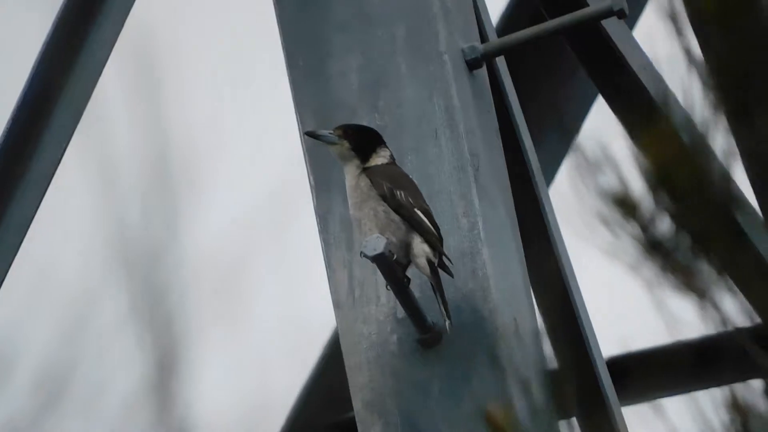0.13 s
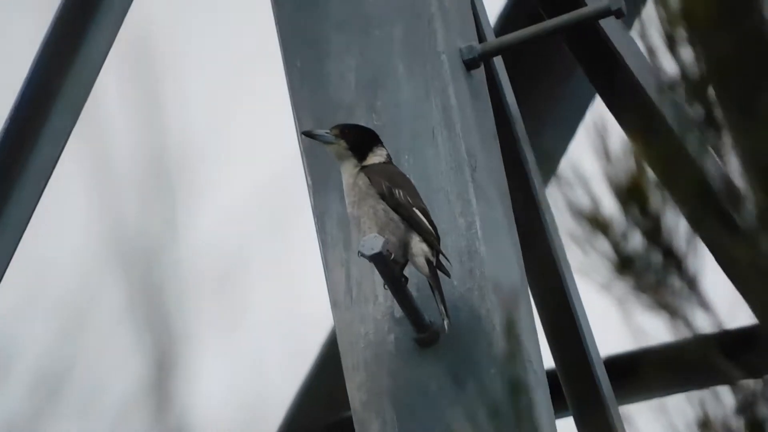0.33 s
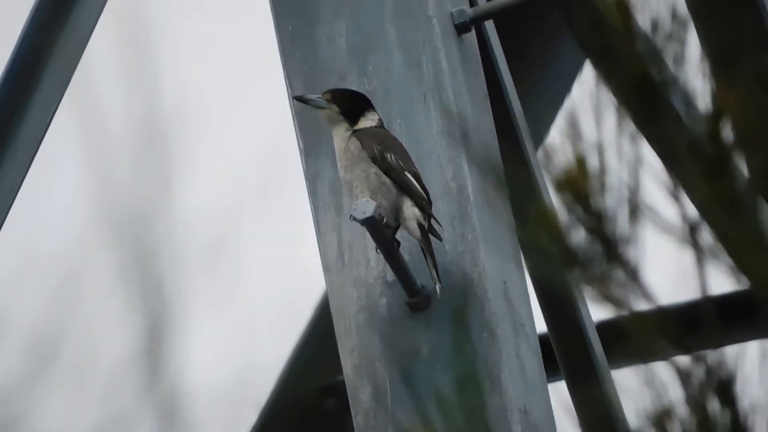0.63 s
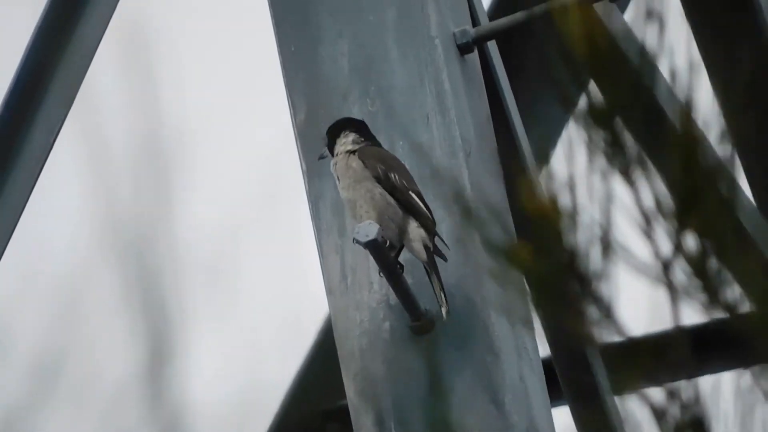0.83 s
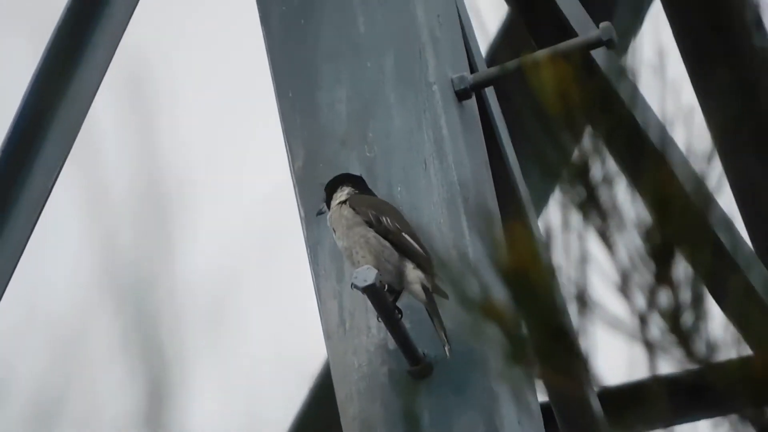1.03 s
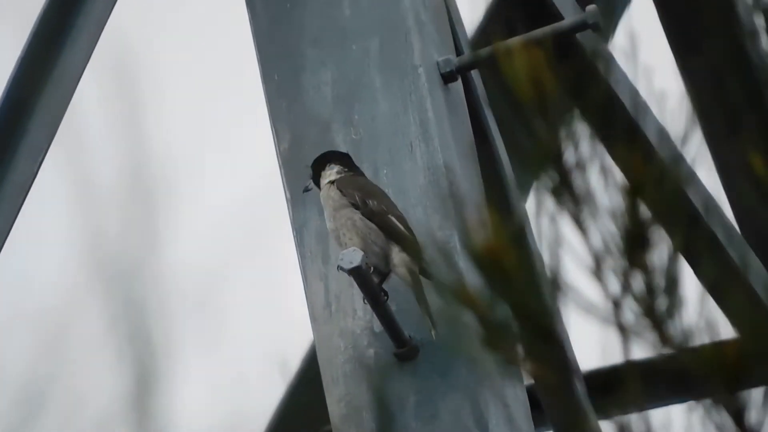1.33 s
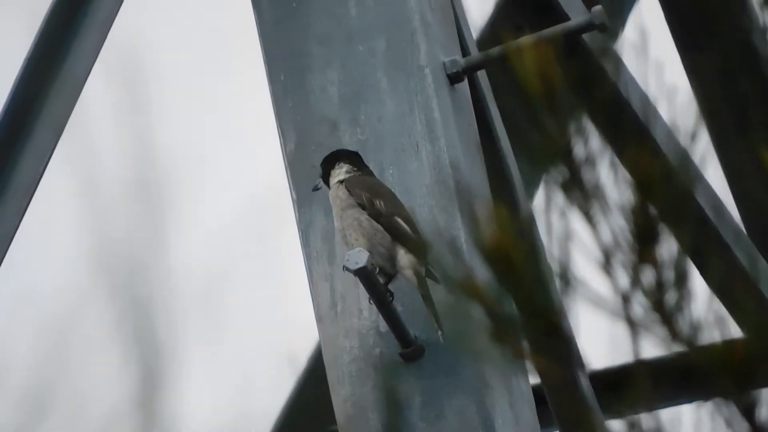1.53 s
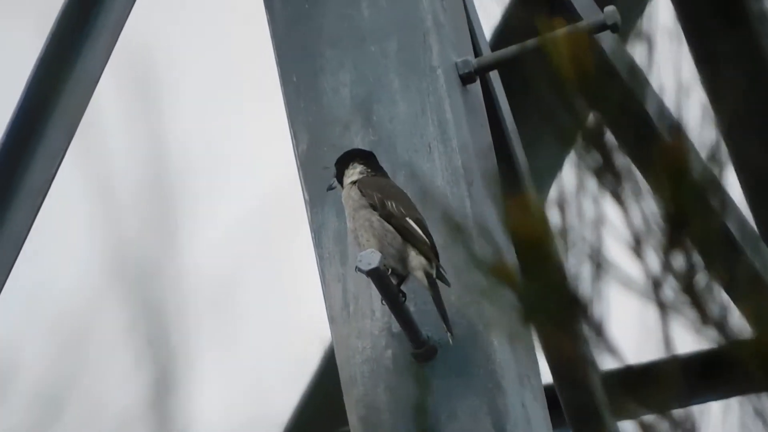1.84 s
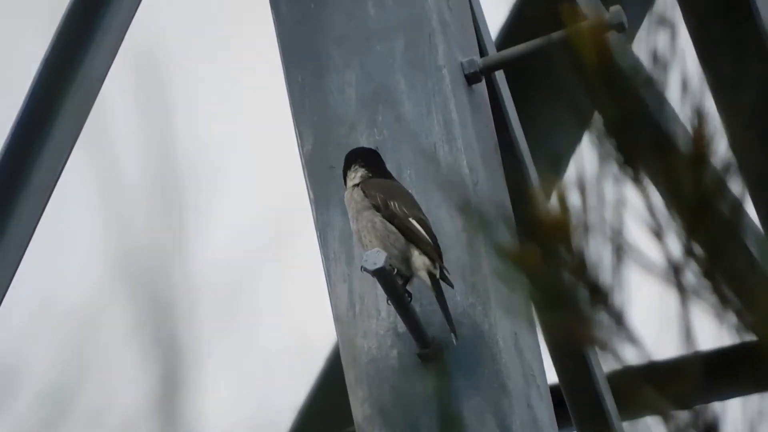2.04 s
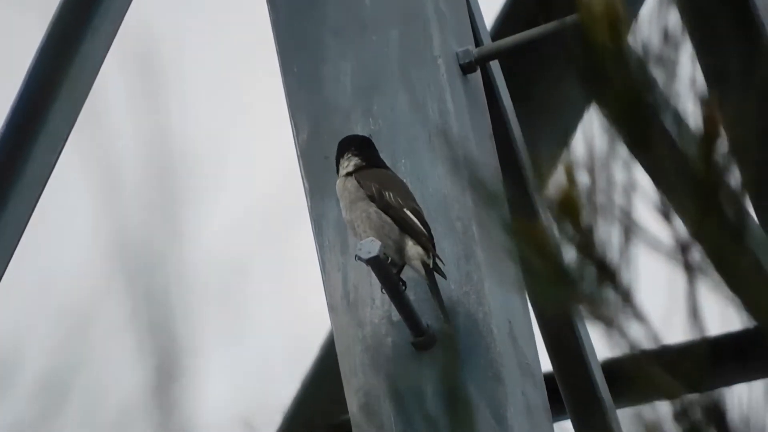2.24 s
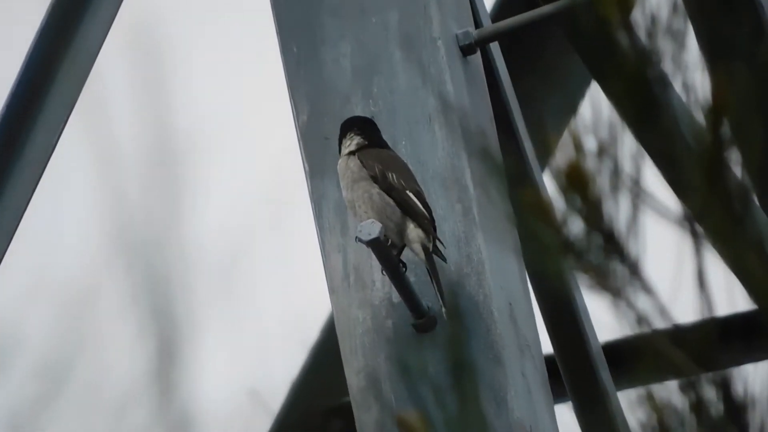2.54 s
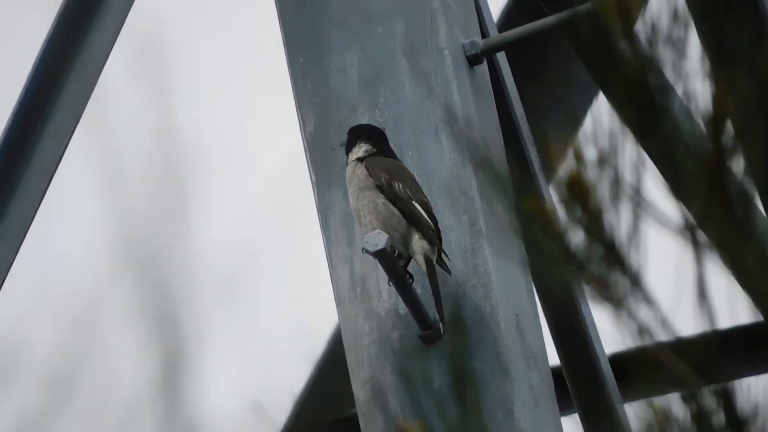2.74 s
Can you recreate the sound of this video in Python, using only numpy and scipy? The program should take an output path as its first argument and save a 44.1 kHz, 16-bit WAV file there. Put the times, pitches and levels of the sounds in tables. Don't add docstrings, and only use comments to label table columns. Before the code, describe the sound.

A songbird pipes quick fluted notes and chirps outdoors over a steady low traffic rumble

```python
import sys
import numpy as np
from scipy import signal
from scipy.io import wavfile
from scipy.ndimage import uniform_filter1d

SR = 44100
rng = np.random.default_rng(int(sys.argv[2]) if len(sys.argv) > 2 else 0)


def undo_db(level):
    steps = np.asarray(level, float) / 20
    return 10 ** steps


def pcm_store(signal):
    levels = np.round(np.clip(np.atleast_2d(signal), -1, 1) * 32767)
    wavfile.write(sys.argv[1], SR, levels.astype(np.int16).T)


N = 126567


def evened(x):
    return x / np.sqrt(np.mean(x ** 2) + 1e-20)


def read(points, hz):
    f, value = np.transpose(points)
    return np.interp(np.log(hz + 1), np.log(f + 1), value)


def add(mix, s, sound):
    part = mix[round(s * SR):][:len(sound)]
    part += sound[:len(part)]


def noise(length):
    return rng.standard_normal(SR // 4)[:length]


def drift(length, size):
    return uniform_filter1d(rng.standard_normal(SR // 4), size)[:length] * np.sqrt(size)


def resonate(x, hz, width):
    turn = np.exp(2j * np.pi * np.cumsum(hz * np.ones(len(x))) / SR)
    r = np.exp(-np.pi * width / SR)
    smooth = np.tile([1 - r, 0, 0, 1, -r, 0], (3, 1))
    return 2 * (turn * signal.sosfilt(smooth, x / turn)).real


PORT_LAG = 2
# pitch in Hz, left minus right in dB.
LEAN = [(60, -0.5), (240, -0.5), (950, -1.0), (3770, -1), (15000, 0)]


def bed(shape, db, swell_db, patchy_db, same, skirt_db):
    frames, hz = N // 512 + 6, np.fft.rfftfreq(2048, 1 / SR)
    a, b, c, d, patches = rng.standard_normal((frames, 1025, 5)).T
    patches = evened(uniform_filter1d(uniform_filter1d(patches, 12, 0), 7, 1))
    same = np.clip(same(hz), -1, 1)[:, None]
    left = a + 1j * b
    right = same * left + np.sqrt(1 - same ** 2) * (c + 1j * d)
    z = np.array([left, right])
    z[0] *= np.exp(-2j * np.pi * hz * PORT_LAG / SR)[:, None]
    below = skirt_db * np.maximum(np.log2(shape[0][0] / (hz + 1)), 0)
    above = skirt_db * np.maximum(np.log2((hz + 1) / shape[-1][0]), 0)
    z *= undo_db((read(shape, hz) + below + above)[:, None] + patchy_db * patches)
    z *= undo_db(np.array([.5, -.5])[:, None, None] * read(LEAN, hz)[:, None])
    sound = signal.istft(z, nperseg=2048, noverlap=1536)[1][:, :N]
    return undo_db(db + swell_db) * evened(sound)


# pitch in Hz, level in dB per Hz.
RUMBLE = [(20, 1.5), (40, 0.5), (57, -11.5), (72, 0.5), (139, -5), (250, -10), (398, -14), (500, -27)]
# pitch in Hz, level in dB per Hz.
TYRES = [(280, -12.5), (480, -6.5), (740, -3.5), (877, -2.5), (1170, -6), (1240, -7), (2020, -14.5),
         (2250, -19), (6000, -44.5), (7800, -93), (13200, -120)]
# pitch in Hz, likeness from 0 to 1.
SAME = [(25, .994), (170, .9975), (300, .98), (600, .9), (1200, .93), (2000, .82), (4000, .55), (6000, .2)]
# time in seconds, rumble in dB, tyres in dB, engine hum in dB.
TRAFFIC = [
    (0, -5, 1, 10),
    (.3, 1, 0, -3),
    (.6, -2, 0, 7.5),
    (0.903, -1, -0.5, -6.5),
    (1.202, -3, 1, 4),
    (1.5, -2, 0.5, 5.5),
    (1.8, -1.5, -1, 7),
    (2.1, -1, -0.5, 6),
    (2.4, 0, -1, -5.5),
    (2.87, 0, -0.5, 4),
]
RUMBLE_DB, TYRES_DB, HUM_DB = -37, -47.5, -50
HUM_HZ, HUM_WIDTH = 56.68, 8.3


def traffic():
    s, rumble_db, tyre_db, hum_db = np.transpose(TRAFFIC)
    t = np.arange(N) / SR

    def same(hz):
        return read(SAME, hz)

    rumble = bed(RUMBLE, RUMBLE_DB, np.interp(t, s, rumble_db), 0.72, same, -28)
    hum = evened(resonate(rng.standard_normal(N), HUM_HZ, HUM_WIDTH))
    hum = undo_db(HUM_DB + np.interp(t, s, hum_db)) * hum
    tyres = bed(TYRES, TYRES_DB, np.interp(t, s, tyre_db), 0.94, same, -45)
    return rumble + hum + tyres


# pitch in Hz, level in dB per Hz.
HISS = [(3530, -7), (6000, -3.5), (6570, -2.5), (15400, -1.5)]


def microphone_hiss():
    return bed(HISS, -71, 0, 0.35, lambda hz: 0 * hz, -20)


RISE_S, FALL_S = .005, .007
WOBBLE, FUZZ = .005, 0.31
FLUTTER_DB, SIDE_FLUTTER_DB = 1.0, 2.0


def whistle(length, db, first_hz, last_hz, partials=(), fade_db=0):
    t = np.arange(0, length + FALL_S, 1 / SR)
    hz = first_hz + (last_hz - first_hz) * t / length
    hz = hz * (1 + WOBBLE * drift(len(t), size=200))
    turn = 2 * np.pi * np.cumsum(hz) / SR
    tone = np.sin(turn)
    for ratio, side_db in partials:
        tone += undo_db(side_db + SIDE_FLUTTER_DB * drift(len(t), size=400)) * np.sin(ratio * turn)
    rise = np.clip(t / RISE_S, 0, 1)
    fall = np.clip((length + FALL_S - t) / (2 * FALL_S), 0, 1)
    level = undo_db(db + fade_db * (t / length) ** 2 + FLUTTER_DB * drift(len(t), size=300))
    fuzz = 1 + FUZZ * drift(len(t), size=120)
    return np.sqrt(2) * level * rise * fall * tone * fuzz


# start in seconds, length in seconds, level in dB, first Hz, last Hz.
WHISTLES = [(.068, .02, -61, 2950, 2860), (.068, .03, -61, 2200, 2150), (.085, .058, -60, 2860, 2960),
            (.139, .034, -53.5, 2950, 2750), (.187, .06, -67, 2910, 2890), (.135, .019, -56, 1990, 1960),
            (.16, .03, -56, 2060, 2260), (.19, .016, -56, 2060, 1900), (.204, .016, -58, 2120, 2170),
            (.418, .02, -58, 2850, 2860), (.688, .027, -57, 3000, 2910), (.775, .025, -62, 3010, 2930),
            (1.053, .015, -57, 1990, 2000), (1.096, .016, -57, 1980, 1960), (.99, .04, -62, 2820, 2740),
            (1.212, .035, -55, 2870, 2850), (1.325, .04, -62, 2610, 2630), (2.04, .059, -65, 1990, 2000),
            (2.33, .07, -63, 2170, 2400), (2.397, .05, -58.5, 2230, 2200), (2.44, .05, -64, 2350, 2390)]
# start in seconds, length in seconds, level in dB, first Hz, last Hz.
CHIRPS = [(0.095, 0.03, -63.5, 3470, 3830), (0.134, 0.036, -71, 6020, 5530),
          (0.164, 0.036, -67, 5500, 5200), (.202, .04, -73, 5210, 5050), (0.184, 0.045, -65.5, 3230, 3300),
          (0.752, 0.019, -69.5, 3820, 3770), (1.024, 0.024, -66, 3540, 3700),
          (1.096, .015, -72, 5030, 4800), (1.109, 0.035, -70, 4570, 4570), (1.137, 0.023, -65, 3900, 3560),
          (1.15, 0.04, -66, 3450, 3640), (1.171, 0.019, -58.5, 3910, 3950), (1.193, 0.023, -60, 3060, 3020),
          (1.226, 0.025, -54.5, 2280, 2220), (1.318, 0.03, -67.5, 3510, 3450),
          (1.401, 0.044, -78, 3950, 4150), (1.443, 0.0385, -70.5, 4250, 3840),
          (0.962, 0.022, -64.5, 2765, 2780), (2.398, 0.06, -76.5, 4520, 4390),
          (1.194, .04, -73, 6200, 5640), (0.307, .025, -69, 5000, 5050), (2.849, 0.047, -62, 4070, 4350)]


def bird():
    out = np.zeros(N)
    for s, *note in WHISTLES:
        add(out, s, whistle(*note))
    for s, *note in CHIRPS:
        octave = [(2, -14)] if 2500 < note[2] < 3400 else []
        add(out, s, whistle(*note, octave))
    return out


RASP_HZ, RASP_ROUGH = 78, .45
RASP_RISE, RASP_CLIMB = 1.25, .1


def rasp(length, db, scale, throat):
    t = np.arange(0, length, 1 / SR)
    phase = (RASP_HZ * t + 0.22 * drift(len(t), size=600)) % 1
    gate = 1 - RASP_ROUGH + RASP_ROUGH * 3 * np.exp(-phase / 0.33)
    drive = gate * noise(len(t))
    climb = scale * (1 + RASP_CLIMB * (t / length - .5))
    body = np.zeros(len(t))
    for hz, width, throat_db in throat:
        body += undo_db(throat_db) * evened(resonate(drive, hz * climb, width))
    breath = np.sin(np.pi * (t / length) ** RASP_RISE)
    return undo_db(db) * breath * evened(body)


# start in seconds, length in seconds, level in dB, throat pitch scale.
RASPS = [
    (.222, 0.12, -49.5, 0.94),
    (0.068, 0.028, -63, 0.97),
]
# pitch in Hz, width in Hz, level in dB.
RASP_THROAT = [(2780, 1230, 3), (3450, 750, -4.5), (4120, 590, -5), (5800, 1800, -14.5)]
# pitch in Hz, width in Hz, level in dB.
TICK_THROAT = [(5200, 1200, 13), (5900, 310, 0)]
SCATTER_WIDTH = .4


def scold():
    out, t = np.zeros((3, N)), np.arange(SR) / SR
    for row in out:
        for (s, *call), throat in zip(RASPS, (RASP_THROAT, TICK_THROAT)):
            add(row, s, rasp(*call, throat))
    haze = rng.standard_normal((2, SR)) * undo_db(-60 * t)
    haze = undo_db(-4) * haze / np.linalg.norm(haze[0])
    lingering = signal.fftconvolve(out[:1], haze, axes=1)[:, :N]
    return out[0] + SCATTER_WIDTH * out[1:] + lingering


# start in seconds, length in seconds, level in dB, first Hz, last Hz.
RASP_VOICES = [
    (.26, 0.0564, -55.5, 2720, 2900),
    (.228, .09, -67, 2900, 3700),
    (.255, 0.044, -67, 4800, 3700),
]


def rasp_voice():
    out, t = np.zeros(N), np.arange(N) / SR
    for k, (s, *note) in enumerate(RASP_VOICES):
        octave = [] if k else [(2, -16)]
        add(out, s, whistle(*note, octave))
    return out * (1 + np.cos(2 * np.pi * RASP_HZ * (t - .2685)))


# start in seconds, length in seconds, level in dB, pitch in Hz, overtones in dB.
FLUTES = [
    (.36, .033, -43, 1825, -14.5),
    (.618, .044, -44.5, 1738, -12),
    (.904, .04, -44.5, 1738, -9.5),
]
# pitch as a multiple of the note, level in dB.
SIDE_TONES = [(1.385, -9), (1.46, -17), (1.587, -4), (1.778, -15)]
# pitch in Hz, width in Hz, level in dB.
FLUTE_AIR = [(2500, 800, 0), (1850, 300, -3), (4400, 800, -22)]
# start in seconds, length in seconds, level in dB, first Hz, last Hz.
GRACES = [(.312, .03, -60, 2600, 2050), (.349, .0175, -49, 2040, 1860), (.389, .033, -51, 1880, 2050),
          (.484, .015, -57, 1980, 1930), (.655, .022, -50, 1790, 1930), (.672, .012, -48, 1780, 1760),
          (.626, .026, -54, 2400, 2440), (.646, .028, -57, 2540, 2560), (.906, .022, -55, 2490, 2460),
          (.372, .02, -57, 2540, 2620), (.942, .028, -53, 1770, 1890), (1.228, .04, -53.5, 2610, 2640),
          (.772, .036, -55, 1990, 1940), (.735, .02, -56, 1770, 1760), (1.008, .016, -55, 1730, 1720),
          (1.03, .02, -56, 1760, 1860)]


def flute():
    out = np.zeros(N)
    for s, length, db, hz, over_db in FLUTES:
        sides = [(ratio, side_db + over_db) for ratio, side_db in SIDE_TONES]
        add(out, s, whistle(length, db, hz * .988, hz * 1.014, sides, fade_db=-2.5))
        add(out, s, rasp(length, db - 10, 0.94, FLUTE_AIR))
    for s, *note in GRACES:
        add(out, s, whistle(*note))
    return out


ECHO_S, ECHO_SMEAR_S, ECHO_DB, ECHO_TOP_HZ = .094, .004, -18, 3400
YARD_DB, YARD_T60, YARD_WIDTH = -8, .75, .45


def outdoors(x):
    t = np.arange(SR) / SR
    taps = rng.standard_normal((2, 3, SR)) * (rng.random((2, 3, SR)) < .05)
    taps = taps[:, :1] + YARD_WIDTH * taps[:, 1:]
    echo = taps[0] * np.exp(-.5 * ((t - ECHO_S) / ECHO_SMEAR_S) ** 2)
    echo = signal.lfilter(*signal.butter(2, ECHO_TOP_HZ, fs=SR), echo)
    tail = taps[1] * undo_db(-60 * t / YARD_T60) * np.clip(t / 0.012, 0, 1)
    echo = undo_db(ECHO_DB) * echo / np.linalg.norm(echo[0])
    tail = undo_db(YARD_DB) * tail / np.linalg.norm(tail[0])
    return x + signal.fftconvolve(x, echo + tail, axes=1)[:, :N]


# time in seconds, then its ringing tones, each with pitch in Hz,
# left dB, right dB, seconds to fall 60 dB, left phase lead in radians.
KNOCKS = [
    (.4702, [(780, -5, -2, .035, -1.0), (1250, -2, -5, .03, 1.5), (1600, -1, 2, .025, -.3), (2000, -4, -2, .022, -.6), (2500, -8, -6, .022, 1.0)]),
    (.4752, [(690, -3, 4, .055, -1.2)]),
    (1.1165, [(480, -5, -9, .13, 2.6), (980, -14, -17, .12, 2.6)]),
]
KNOCK_DB, KNOCK_RISE_S = -36.5, .0007


def knock():
    t, out = np.arange(0, .1, 1 / SR), np.zeros((2, N))
    rise = np.sin(np.pi / 2 * np.clip(t / KNOCK_RISE_S, 0, 1)) ** 2
    for s, modes in KNOCKS:
        for hz, left_db, right_db, t60, lead in modes:
            turn, decay = 2 * np.pi * hz * t, -60 * t / t60
            add(out[0], s, undo_db(KNOCK_DB + left_db + decay) * rise * np.sin(turn + lead))
            add(out[1], s, undo_db(KNOCK_DB + right_db + decay) * rise * np.sin(turn))
    return out


# start in seconds, length in seconds, level in dB, first Hz, last Hz.
WARBLES = [
    (1.19, .055, -53, 1690, 1630),
    (1.268, .052, -52, 1630, 1520),
    (1.345, .065, -52, 1560, 1450),
    (1.29, .035, -61, 2900, 2880),
    (1.345, .07, -61, 2880, 2990),
    (1.22, .05, -58, 2300, 2300),
]


def warble():
    out = np.zeros((2, N))
    for s, length, db, first_hz, last_hz in WARBLES:
        t = np.arange(0, length, 1 / SR)
        hz = first_hz + (last_hz - first_hz) * t / length
        swell = np.sqrt(np.sin(np.pi * t / length))
        for row in out:
            hiss = resonate(noise(len(t)), hz, width=240)
            add(row, s, undo_db(db) * swell * evened(hiss))
    return np.array([out[0], out[0] + SCATTER_WIDTH * out[1]])


def placed(x, pan_db, lag=0):
    return np.array([np.roll(x[0], lag) * undo_db(pan_db / 2), x[-1] * undo_db(-pan_db / 2)])


FLUTE_PAN_DB, BIRD_PAN_DB = -1.2, -3.2


def scene():
    road = traffic()
    ahead = placed(flute()[None], FLUTE_PAN_DB)
    right = placed(bird()[None], BIRD_PAN_DB, PORT_LAG)
    scattered = placed(scold() + rasp_voice() + warble(), BIRD_PAN_DB, PORT_LAG)
    return road + outdoors(ahead + right) + scattered + knock()


def band_limit(x):
    return signal.sosfilt(signal.butter(12, 16370, fs=SR, output="sos"), x)


START_S, OPEN_S, CLOSE_S = .0722, .0015, .002
EDGE_HZ = 15740


def record(dry):
    sample = np.arange(N)
    opening = np.clip((sample / SR - START_S) / OPEN_S, 0, 1)
    closing = np.clip((N - sample) / SR / CLOSE_S, 0, 1)
    heard = (dry + microphone_hiss()) * opening * closing
    edge = signal.firwin(1023, EDGE_HZ, window=("kaiser", 8), fs=SR)
    mix = signal.oaconvolve(heard, edge[None], "same")
    return band_limit(mix)


dry = scene()
out = record(dry)
pcm_store(out)
```